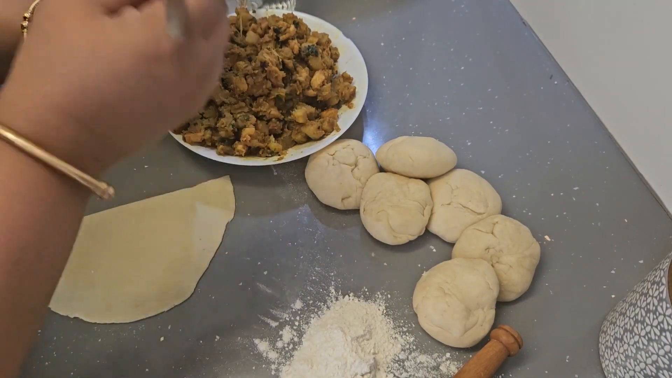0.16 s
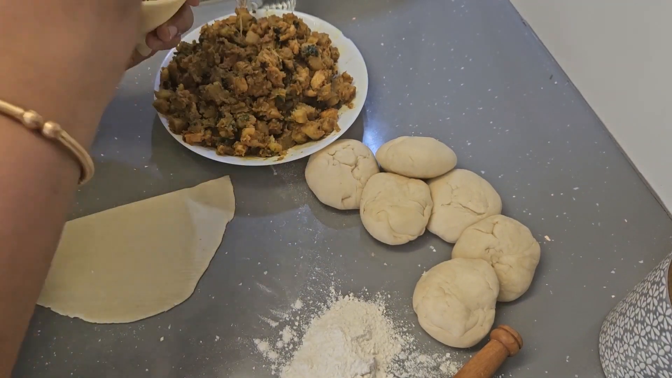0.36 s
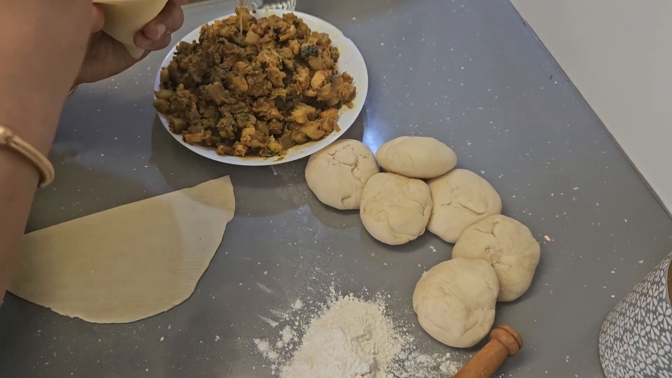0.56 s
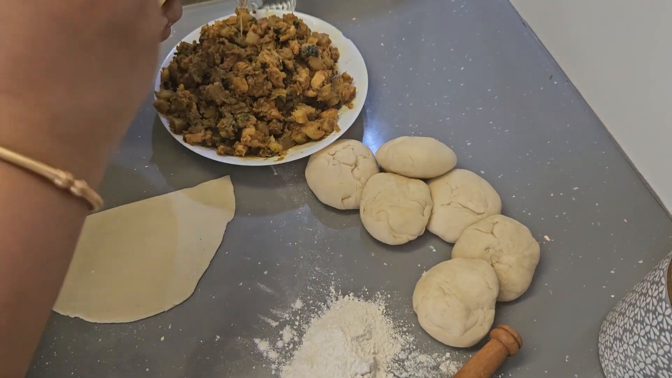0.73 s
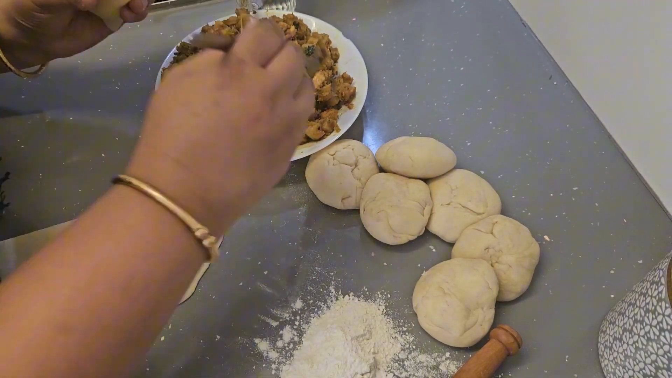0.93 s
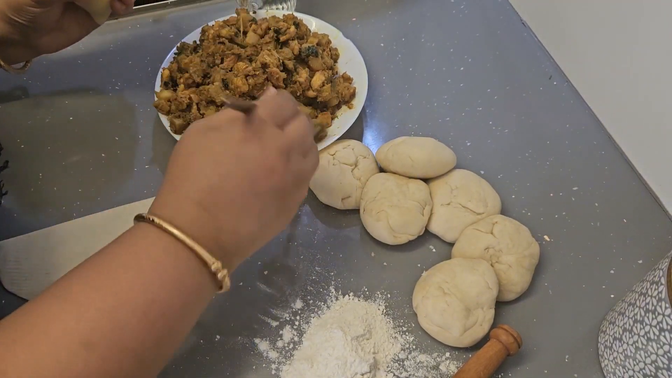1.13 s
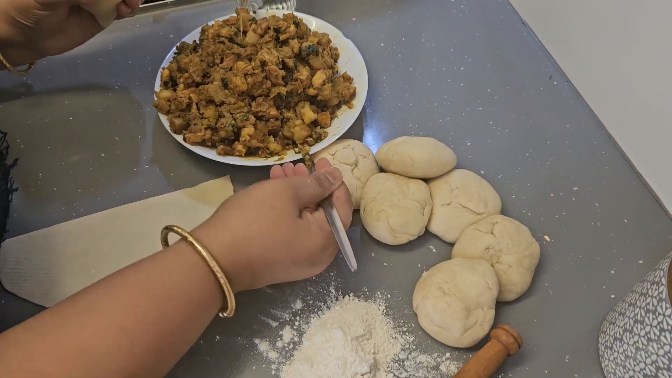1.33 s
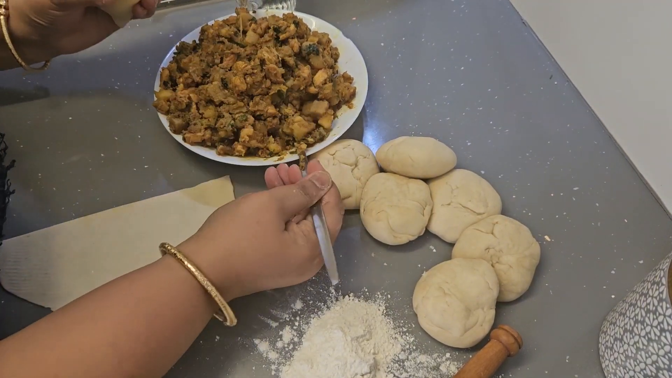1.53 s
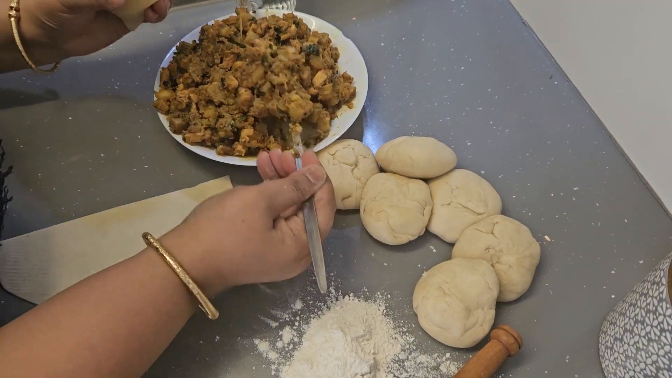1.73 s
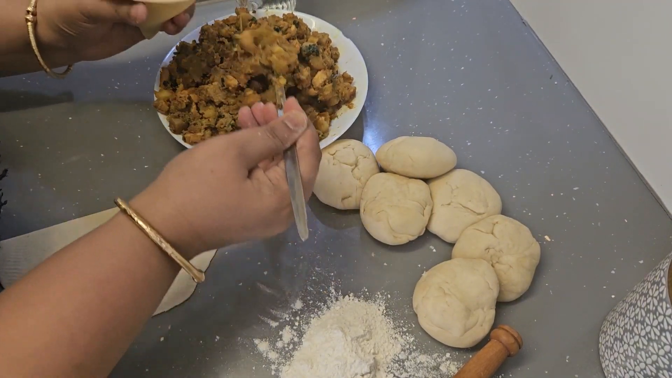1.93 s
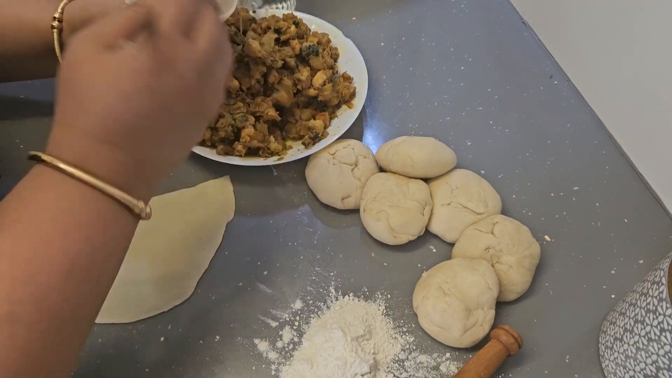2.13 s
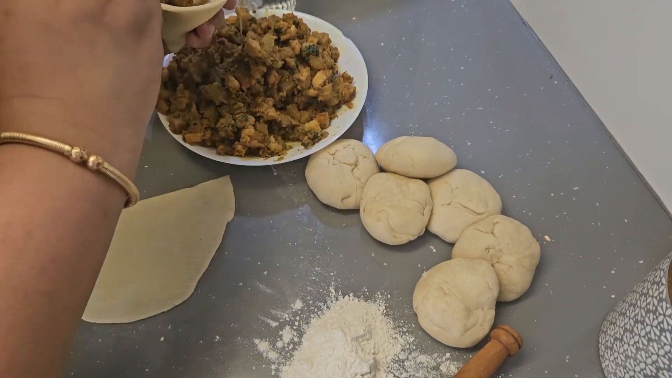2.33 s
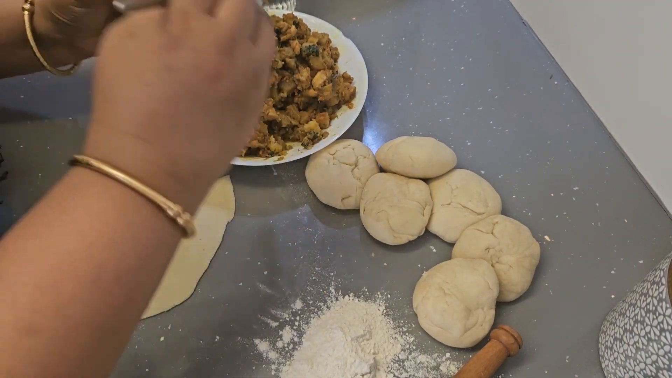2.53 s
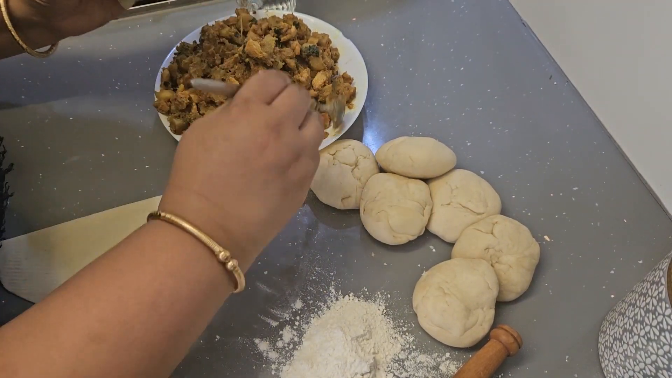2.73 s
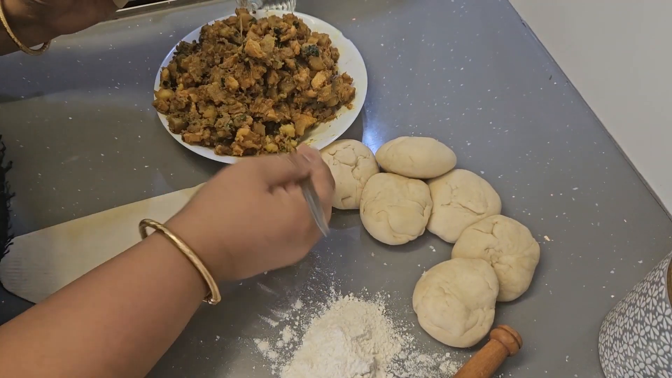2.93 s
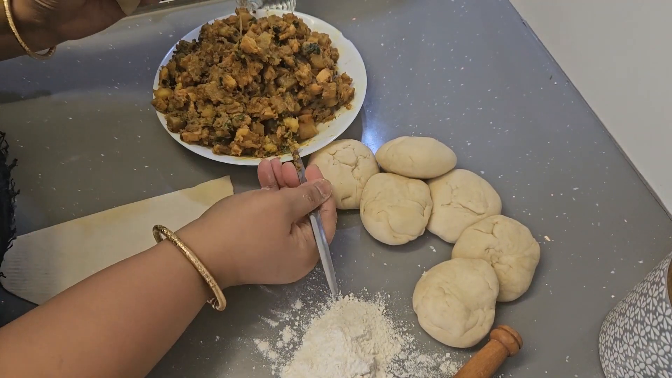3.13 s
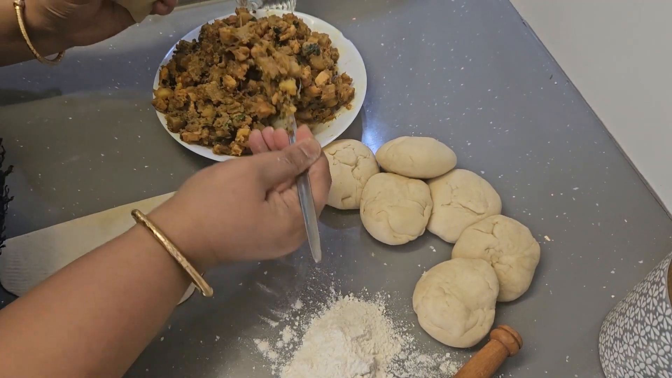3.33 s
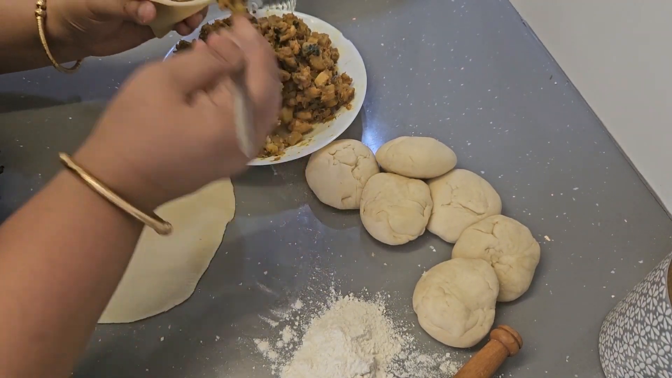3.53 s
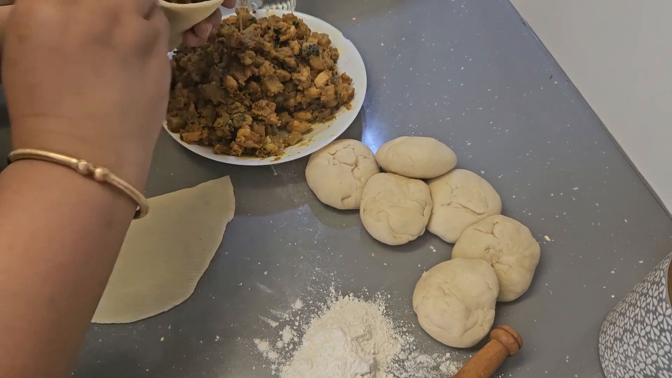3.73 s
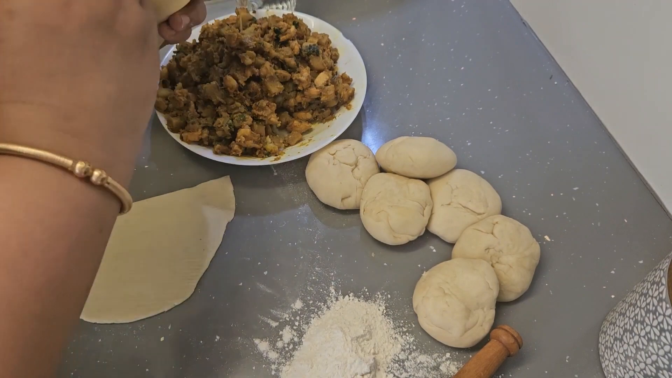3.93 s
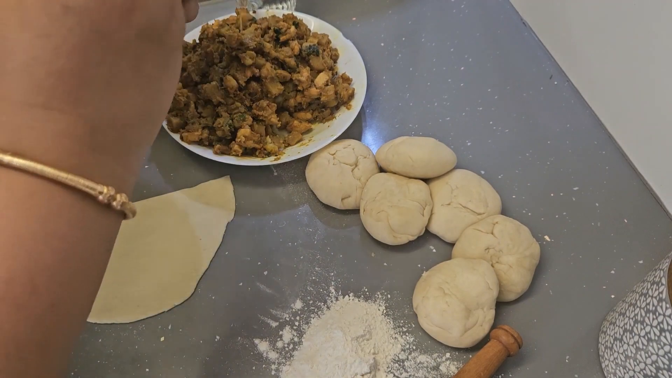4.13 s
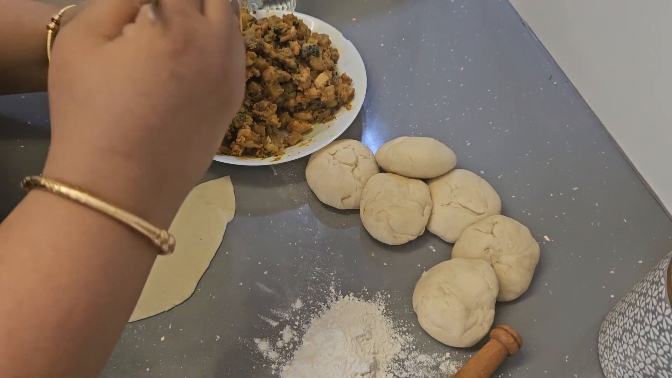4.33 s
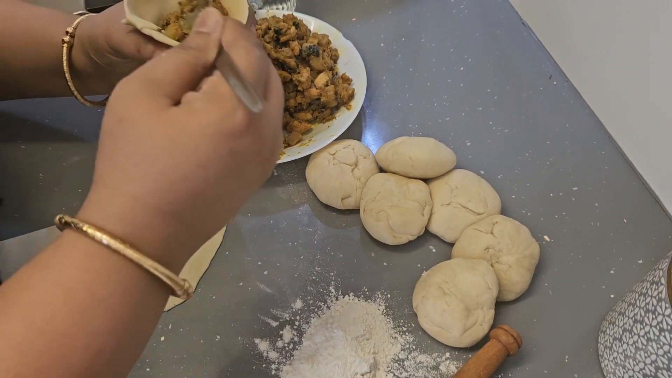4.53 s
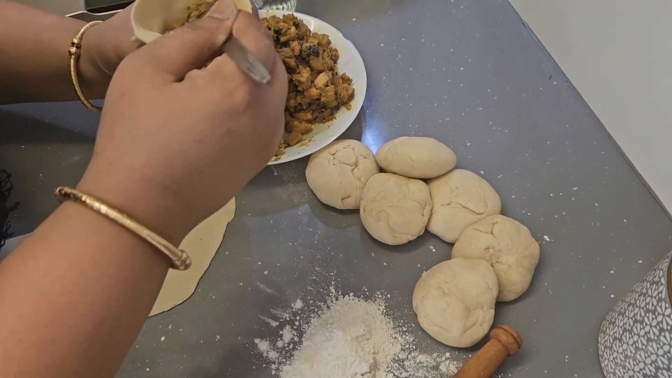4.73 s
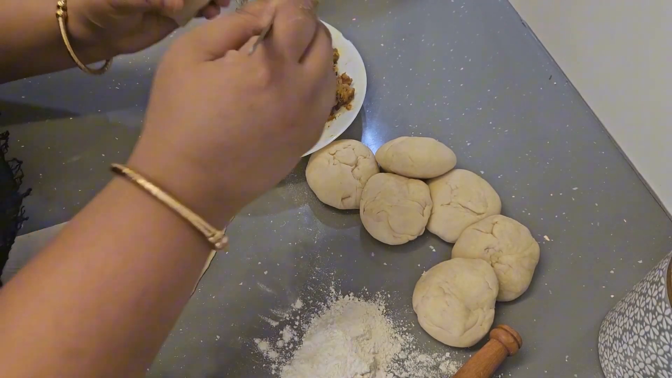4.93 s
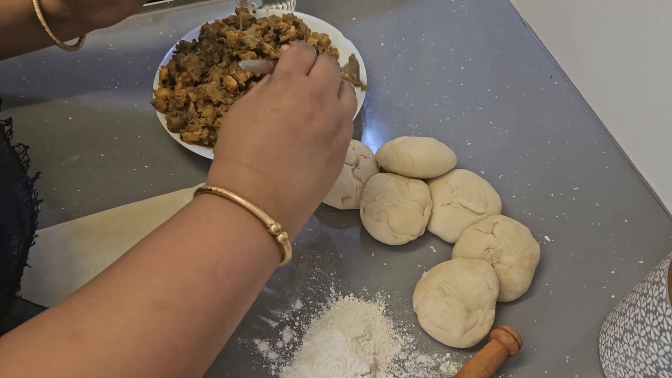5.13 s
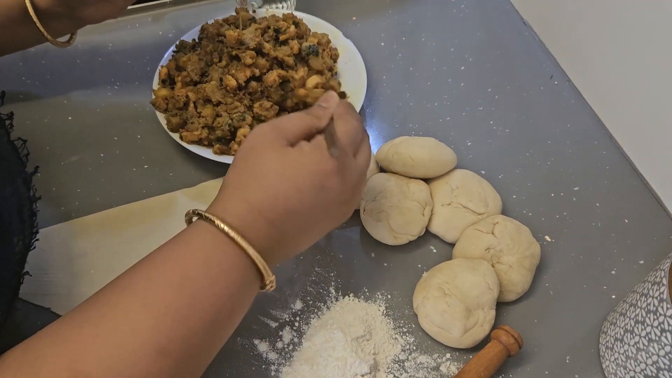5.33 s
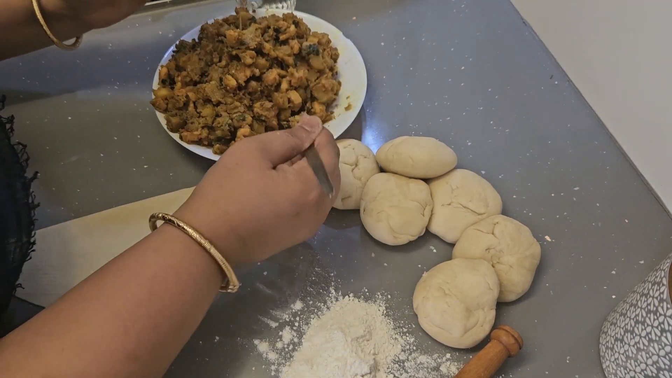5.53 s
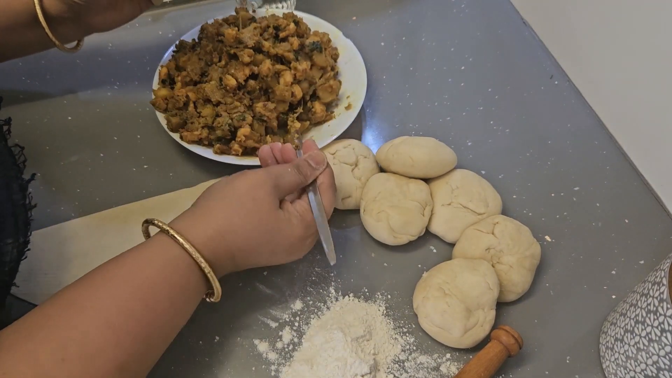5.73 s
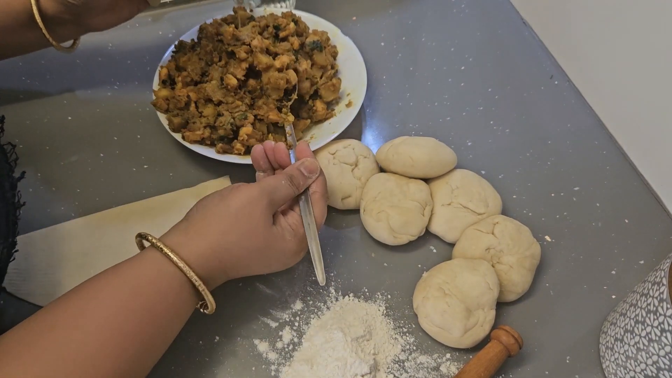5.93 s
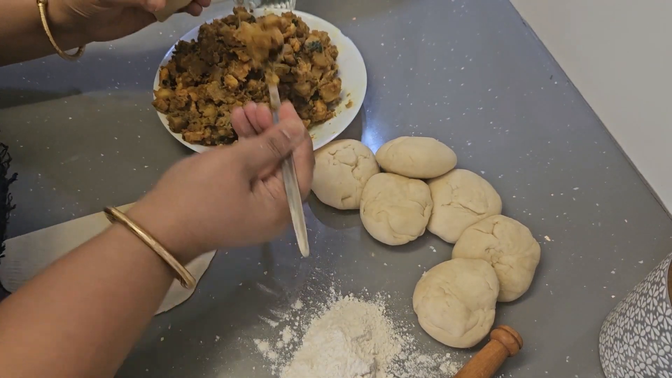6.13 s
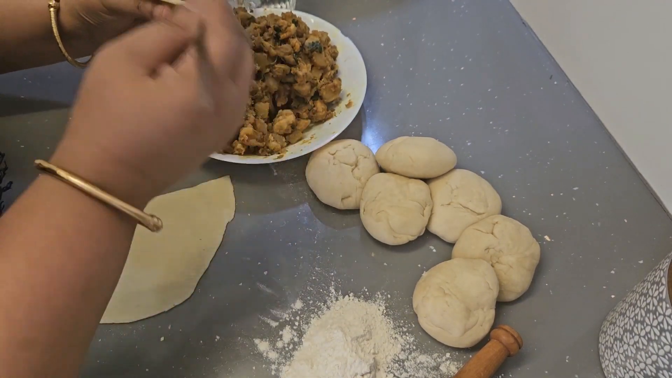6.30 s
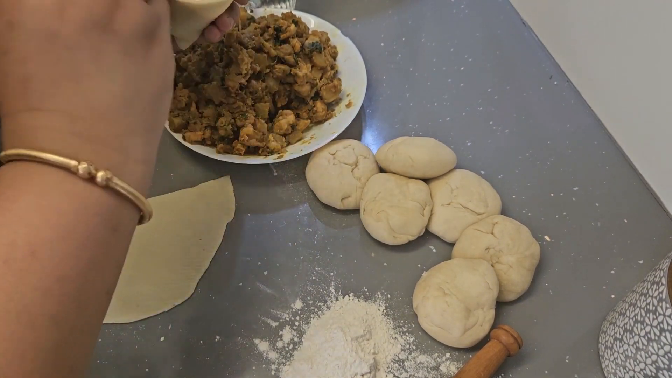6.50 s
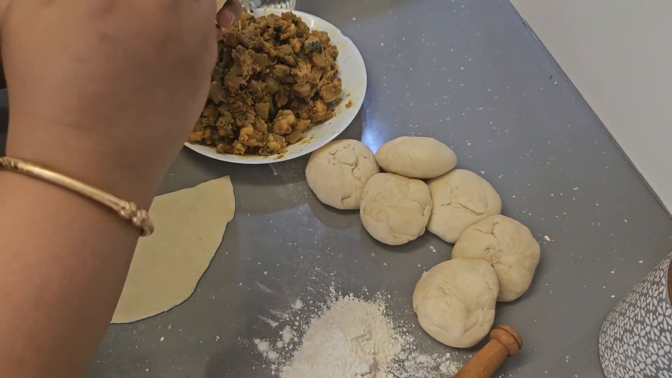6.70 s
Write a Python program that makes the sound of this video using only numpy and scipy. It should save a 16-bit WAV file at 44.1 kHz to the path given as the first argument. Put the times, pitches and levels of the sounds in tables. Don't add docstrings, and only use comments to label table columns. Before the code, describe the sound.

A steel spoon clinks on a food-heaped ceramic plate in three short bursts, with faint moist ticks over low kitchen rumble, hum and hiss.

```python
import sys
import numpy as np
from scipy import signal
from scipy.fft import rfft, irfft
from scipy.io import wavfile
from scipy.ndimage import uniform_filter1d

SR = 44100
rng = np.random.default_rng(int(sys.argv[2]) if len(sys.argv) > 2 else 0)


def bounce(signal):
    frames = np.transpose(np.atleast_2d(signal))
    limited = np.clip(frames, -1, 1)
    pcm = np.round(limited * 32767).astype(np.int16)
    wavfile.write(sys.argv[1], SR, pcm)


def magnitude_from_level(level_db):
    exponent = np.asarray(level_db, float) / 20
    return 10 ** exponent


N = 302470


def unit_rms(x):
    return x / np.sqrt(np.mean(x ** 2) + 1e-20)


def read(points, hz):
    f, value = np.transpose(points)
    return np.interp(np.log(hz + 1), np.log(f + 1), value)


def bumps_db(resonances, hz):
    return sum(db / (1 + (2 * (hz - f) / w) ** 2) for f, w, db in resonances)


def add(mix, start_s, sound):
    part = mix[..., round(start_s * SR):][..., :sound.shape[-1]]
    part += sound[..., :part.shape[-1]]


def rumble_spectrum_db(hz):
    # frequency in Hz, density in dB per Hz.
    rumble = [(8.8, -45), (15, -14.5), (38, -2.5), (59, -7.5), (75, -22), (102, -6), (143, -18), (304, -22),
              (378, -18.5), (451, -22), (539, -24.5), (786, -29.5), (958, -27.5), (1210, -28), (1700, -64),
              (2210, -72), (3740, -120)]
    # centre in Hz, width in Hz, height in dB.
    room_tones = [(196.8, 8.4, 6.5), (258, 20, 2.5), (340, 42, 6.5), (384.7, 10.2, 7), (435.3, 35.6, 10.5),
                  (648, 54, 8), (778.7, 19, 11.5), (1250, 85, 9)]
    return read(rumble, hz) + bumps_db(room_tones, hz)


def hiss_spectrum_db(hz):
    # frequency in Hz, density in dB per Hz.
    hiss = [(820, -33), (1400, -2.5), (1600, -9), (2320, -8.5), (2520, -3.5), (2740, -17), (3070, -8.5),
            (5470, -2), (6860, -7), (8260, -3.5), (9750, -9.5), (12000, -0.5), (13400, -7), (15850, -5.5),
            (16100, -54)]
    # centre in Hz, width in Hz, height in dB.
    port_tones = [(1868, 36, 7.5), (3010, 690, 4), (4270, 31, 12), (7410, 106, 6.5), (12030, 280, 7.5),
                  (12300, 180, -6.5)]
    return read(hiss, hz) + bumps_db(port_tones, hz)


def steady_noise(spectrum_db, patchy_db):
    # frequency in Hz, correlation from -1 to 1.
    likeness = [(60, 0.99), (130, 0.98), (290, 0.87), (640, 0.48), (1410, -0.15), (3100, -0.04),
                (6820, 0.11), (15000, 0.06)]
    # frequency in Hz, left over right in dB.
    tilt = [(60, 2.5), (150, -2.5), (380, -1.0), (950, 0), (2380, 0.5), (5980, 1.5), (15000, -2.5)]
    frames, hz = N // 512 + 5, np.fft.rfftfreq(2048, 1 / SR)
    a, b, c, d, patches = rng.standard_normal((frames, 1025, 5)).T
    patches = uniform_filter1d(patches, size=12, axis=0)
    patches = unit_rms(uniform_filter1d(patches, size=10, axis=1))
    same = np.clip(read(likeness, hz), -1, 1)[:, None]
    left = a + 1j * b
    right = same * left + np.sqrt(1 - same ** 2) * (c + 1j * d)
    side_db = np.multiply.outer([.5, -.5], read(tilt, hz))
    level_db = (spectrum_db(hz) + side_db)[..., None] + patchy_db * patches
    z = np.array([left, right]) * magnitude_from_level(level_db)
    return unit_rms(signal.istft(z, nperseg=2048, noverlap=1536)[1][:, :N])


def noise_floor():
    rumble_db, hiss_db = -51, -56
    rumble = magnitude_from_level(rumble_db) * steady_noise(rumble_spectrum_db, 1.0)
    return rumble + magnitude_from_level(hiss_db) * steady_noise(hiss_spectrum_db, 1.0)


def wavering_tone(hz, rms_db):
    waver_db, waver_top_hz = 4, 3.5
    t, phase = np.arange(N) / SR, rng.random(12)
    rates_hz = waver_top_hz * np.geomspace(.2, 1, 12)
    waver = sum(np.sin(2 * np.pi * (f * t + p)) for f, p in zip(rates_hz, phase))
    turns = np.cumsum(hz + 0 * t) / SR
    return np.sqrt(2) * magnitude_from_level(rms_db + waver_db * unit_rms(waver)) * np.sin(2 * np.pi * turns)


def compressor():
    hum_hz, hum_db, start_s, rise_s = 49.1, -51.5, 0.64, 1.8
    fade_s, fade_db_per_s = 5.7, 10.5
    t = np.arange(N) / SR
    up = np.clip((t - start_s) / rise_s, 0, 1)
    return np.sqrt(up) * wavering_tone(hum_hz, hum_db - fade_db_per_s * np.maximum(t - fade_s, 0))


def engine():
    idle_hz, slow_hz, slows_s, slowing_s = 31.4, 24.74, 3.6, 1.9
    idle_db, slowing_dip_db, third_order, third_db = -58.5, -20, 2.93, -57
    t = np.arange(N) / SR
    slowed = np.clip((t - slows_s) / slowing_s, 0, 1)
    speed_hz = idle_hz + (slow_hz - idle_hz) * slowed
    first = wavering_tone(speed_hz, idle_db + slowing_dip_db * np.sqrt(slowed))
    return first + slowed ** 5 * wavering_tone(third_order * speed_hz, third_db)


def traffic():
    # centre in seconds, half length in seconds, frequency in Hz, level in dB.
    booms = [(0.02, 0.1, 31.3, -51.5), (0.296, 0.15, 99.4, -59), (0.698, 0.2, 100.2, -58.5),
             (1.298, 0.054, 49, -61), (1.343, 0.068, 96.5, -54.5), (2.002, 0.32, 93, -59.5),
             (2.706, 0.096, 94.6, -55), (3.25, 0.14, 95, -58), (3.695, 0.05, 105.3, -49),
             (3.884, 0.21, 49.1, -47), (4.013, 0.11, 101.9, -46), (4.367, 0.2, 100.1, -50.5),
             (4.85, 0.11, 100.8, -54.5), (5.276, 0.14, 48.1, -42), (5.304, 0.17, 99.8, -53),
             (5.62, 0.083, 47.83, -47), (5.947, 0.17, 25.13, -50), (6.09, 0.13, 96, -46),
             (6.377, 0.061, 44.8, -50), (6.538, 0.057, 99, -49.5), (6.666, .08, 46.5, -54),
             (6.845, 0.059, 102, -53.5)]
    t, out = np.arange(N) / SR, np.zeros(N)
    for centre_s, half_s, hz, db in booms:
        swell = np.exp(-((t - centre_s) / half_s) ** 2)
        out += np.sqrt(2) * magnitude_from_level(db) * swell * np.cos(2 * np.pi * hz * t)
    return out


def kitchen(x):
    # frequency in Hz, t60 in seconds.
    decay = [(300, 0.6), (1000, 0.27), (3000, 0.3), (8000, 0.29), (15000, 0.083)]
    taps = np.zeros((2, SR // 2))
    at = np.arange(100, SR // 2 - 20, 20)
    at = at + rng.integers(0, 20, (2, len(at)))
    np.put_along_axis(taps, at, rng.choice([-1., 1.], at.shape), 1)
    taps *= 1 + 1.0 * np.exp(-np.arange(SR // 2) / SR / 0.014)
    hz, t, z = signal.stft(taps, SR, nperseg=256)
    z = z / np.sqrt(abs(z) + 1e-9)
    z = z * magnitude_from_level(-60 * t / read(decay, hz)[:, None])
    tail = signal.istft(z, SR, nperseg=256)[1]
    return signal.fftconvolve(x, tail / np.linalg.norm(tail[0]), axes=1)[:, :x.shape[1]]


def modes(hz, db, t60_s, rise_s, wide, beat=0):
    t = np.arange(min(SR // 2, int(SR * np.max(t60_s)) + 200)) / SR
    phase, late, turn, split = rng.random((len(hz), 4)).T[..., None]
    hz, db, t60_s = (np.reshape(v, (-1, 1)) for v in (hz, db, t60_s))
    contact_s = rise_s * (.5 + late)
    size = magnitude_from_level(db - 60 * np.maximum(t - 0.44 * contact_s, 0) / t60_s)
    size *= np.clip(t / contact_s, 0, 1) ** 2
    size *= 1 + beat * np.cos(2 * np.pi * (25 + 45 * split) * t)
    angle = 2 * np.pi * (hz * t + phase)
    middle = (size * np.sin(angle)).sum(0)
    lean = hz / 25000
    side_size = wide * hz / (hz + 500) * size
    side = (side_size * np.cos(angle + 0.71 * (turn - .5) + lean)).sum(0)
    return np.pad([middle + side, middle - side], [(0, 0), (0, SR // 2 - len(t))])


def knock():
    # start in seconds, level in dB.
    set_down = (5.802, -34)
    # frequency in Hz, level in dB, t60 in seconds.
    hollow = [(257, 1, 0.31), (343, -11.5, 0.19), (435, -7, 0.15), (530, -3, 0.074), (598, -16, 0.24),
              (836, -18, 0.1)]
    start_s, peak_db = set_down
    body = magnitude_from_level(peak_db) * modes(*np.transpose(hollow), 0.016, 0.45) * magnitude_from_level([[-.7], [.7]])
    return start_s, body + magnitude_from_level(-10) * kitchen(body).mean(0)


def tick(start_s, peak_db, hz, length_ms):
    t = np.arange(900) / SR
    puff = rng.standard_normal((2, 900)) * np.exp(-t * 1000 / length_ms)
    edges_hz = [hz * 0.87, min(hz * 1.24, 16000)]
    puff = signal.sosfilt(signal.butter(2, edges_hz, "band", fs=SR, output="sos"), puff)
    return start_s, magnitude_from_level(peak_db + 8.5) * puff / abs(puff).max()


def tinkle(start_s, peak_db, hz, t60_s):
    return start_s, modes([hz, hz * 1.02], [peak_db - 4, peak_db - 8], [t60_s, t60_s], 0.002, 0.82)


def contact_crack(hz, db, width_hz, rise_s):
    u = np.arange(SR // 2) / SR / rise_s
    envelope = np.minimum(u, .6) * np.exp(-np.maximum(u - 1.6, 0) / 2.0)
    scratch = rfft(rng.standard_normal((2, SR // 2)) * envelope)
    even = np.sqrt(uniform_filter1d(abs(scratch) ** 2, size=120))
    scratch /= even / np.sqrt(rise_s * SR)
    scratch = np.array([[1, 1.0], [1, -1.8]]) @ scratch / np.sqrt(2)
    bins_hz = np.fft.rfftfreq(SR // 2, 1 / SR)[:, None]
    blurred = (magnitude_from_level(db) * np.sqrt(width_hz) / (1 + ((bins_hz - hz) / 550) ** 2)).sum(1)
    between = 0.14 * np.exp(-np.log(bins_hz[:, 0] / 2200 + 1e-9) ** 2 / 0.5)
    return irfft(scratch * (blurred / blurred.max() + between), SR // 2) * (u < 40)


def scatter(colour, db):
    hz = np.fft.rfftfreq(SR // 2, 1 / SR)
    low_cut = hz ** 2 / (hz ** 2 + 450 ** 2)
    delay = np.exp(-2j * np.pi * hz * .003)
    click = irfft(magnitude_from_level(read(colour, hz)) * low_cut * delay, SR // 2)
    return magnitude_from_level(db) * click / np.linalg.norm(click)


def clink(row, spot, family_db, rings, sideways, colour, scatter_db):
    # frequency in Hz, level in dB, t60 in seconds.
    plate_body = [(600, -2.5, 0.074), (691, 0.5, 0.054), (1042, -2, 0.02), (1393, 11, 0.012),
                  (1510, 1, 0.025), (1784, -11, 0.096), (2230, -8, 0.066), (2620, -2, 0.049)]
    family_edges_hz = [800, 1200, 1430, 1700]
    # centre in Hz, width in Hz, level in dB.
    clink_gaps = [(4740, 160, -7), (5000, 160, -9), (13500, 330, -1)]
    start_s, peak_db, contact_ms, crack_db, pan_db = row
    rise_s = contact_ms / 1000
    hz, width_hz, db = np.transpose(spot)
    width_hz = np.clip(width_hz, 30, 900)
    damped = modes(hz, db + 20 * np.log10(width_hz), 2.0 / width_hz, rise_s, 1.0)
    damped /= abs(damped.mean(0)).max()
    crack = contact_crack(hz, db, width_hz, rise_s)

    body_hz, body_db, body_t60_s = np.transpose(plate_body)
    body_db = body_db + np.take(family_db, np.searchsorted(family_edges_hz, body_hz))
    free = modes(body_hz, body_db, body_t60_s, rise_s, 0.97)
    free = free + modes(*np.transpose(rings), rise_s, 0.73, beat=0.74)
    free = free + modes(*np.transpose(sideways), rise_s, 0) * [[1], [-.8]]

    pan = magnitude_from_level(peak_db + np.array([[.5], [-.5]]) * pan_db)
    sound = pan * (damped + free + magnitude_from_level(crack_db) * crack)
    room_db = -13
    echo = kitchen(magnitude_from_level(room_db) * sound + scatter(colour, peak_db + scatter_db))
    gaps = magnitude_from_level(bumps_db(clink_gaps, np.fft.rfftfreq(SR // 2, 1 / SR)))
    return start_s - .0006, irfft(rfft(sound + echo) * gaps, SR // 2)


def landing_spots():
    # frequency in Hz, width in Hz, level in dB.
    rim = [(2290, 200, -6), (3100, 100, -11), (4450, 120, -13), (5510, 79, -4), (6140, 130, 3.5),
           (8340, 140, 3), (8800, 100, -6), (10000, 200, -9), (11300, 89, -7), (12300, 290, -2),
           (12450, 160, -7), (13000, 78, -19), (14100, 95, -7), (15800, 120, -16)]
    # Hz, Hz, dB.
    rim_graze = [(3310, 120, -1.5), (3800, 120, -6), (4470, 250, -2), (5830, 260, 1), (7350, 130, -5.5),
                 (8930, 100, -9), (9360, 470, -11), (11000, 130, -1), (11600, 100, -5), (12300, 150, 0),
                 (14500, 270, -6), (15000, 99, -17), (15500, 97, -21)]
    # Hz, Hz, dB.
    under_food = [(1210, 170, -2), (1890, 94, 1), (2250, 200, 0), (2920, 77, -5), (3500, 91, -7)]
    # Hz, Hz, dB.
    slope = [(2860, 55, -4), (3380, 110, -4.5), (4350, 110, -8), (5510, 61, -4), (6500, 330, -2),
             (8100, 340, 2.5), (8800, 170, -14), (9500, 130, -13), (10250, 91, -1.5), (10900, 95, -5),
             (12300, 120, -3), (13500, 64, -15), (13950, 130, -12), (14900, 150, -10)]
    # Hz, Hz, dB.
    spoon_edge = [(3070, 220, -10), (5380, 130, -11), (6160, 180, -6.5), (6630, 120, -13), (7320, 160, -2),
                  (7980, 72, -8), (8100, 97, -11), (8970, 190, -9), (9900, 130, -12), (10440, 95, -5),
                  (12300, 520, -10), (14300, 100, -10), (14900, 87, -15), (15600, 110, -18)]
    # Hz, Hz, dB.
    spoon_back = [(690, 88, 0.5), (2884, 89, 8), (3400, 58, 0), (4400, 130, -4), (5400, 400, 0),
                  (7300, 210, -15), (8100, 200, -10), (9000, 130, -9), (9590, 150, -20),
                  (11100, 230, -10.5), (12300, 120, -18), (15700, 110, -25)]
    # Hz, Hz, dB.
    well = [(1550, 160, -5), (2210, 130, -3.5), (3390, 140, -3), (4400, 150, -3), (5540, 190, 5.5),
            (6240, 130, -3.5), (7430, 150, 0), (3740, 110, -4), (8230, 180, -2), (9070, 130, -5),
            (9700, 110, 0.5), (12180, 90, 1.5), (12980, 290, -3), (15200, 110, 0)]
    return [rim, rim_graze, under_food, slope, spoon_edge, spoon_back, well]


def scene():
    # start in seconds, level in dB, centre in Hz, length in ms.
    food_ticks = [(0.1474, -55, 5600, 3), (0.2344, -59, 4200, 3), (0.7944, -54, 8640, 3),
                  (0.8494, -52, 8100, 3.7), (0.9714, -52, 8230, 3), (2.992, -53.5, 1410, 20),
                  (1.672, -47, 8500, 2.9), (4.0433, -50, 4930, 3.3), (4.2236, -49, 8340, 3),
                  (4.6857, -51.5, 8580, 3), (4.724, -53, 5250, 3), (5.0823, -50.5, 5510, 4.4),
                  (5.094, -50, 7140, 3.3), (5.525, -50, 5400, 2.6), (5.629, -53, 3560, 3),
                  (5.658, -45, 10000, 3.1), (5.6744, -51, 5500, 2.7), (5.7694, -56, 5040, 3.3),
                  (5.8294, -55, 5070, 2.5), (5.943, -44.5, 10400, 3), (6.1894, -58, 4700, 2.7),
                  (6.29, -53, 8500, 3.8),
                  (0.9637, -46, 11600, 3.3), (2.0338, -47.5, 11850, 3), (2.7317, -52, 11600, 3),
                  (5.257, -39, 14000, 3), (6.5495, -49, 12300, 3)]
    # start in seconds, level in dB, frequency
    # in Hz, t60 in seconds.
    tinkles = [(1.1365, -26.5, 2290, 0.067), (1.297, -52, 5620, 0.09), (3.2276, -52, 7400, 0.05),
               (3.7838, -50, 7340, 0.05), (6.3096, -50, 7350, 0.05), (6.3294, -53, 7320, 0.05),
               (6.399, -44.5, 7420, 0.053), (6.4333, -57, 7460, 0.05)]
    # start in seconds, peak in dB, contact in ms, crack in dB, left over right in dB.
    clinks = [
        (1.13, -21.5, 2, 4.5, 1.5),
        (1.37, -25.5, 1.5, 5.5, 2),
        (1.507, -44, 2.3, 4.5, 1),
        (2.788, -19.5, 2, 0.5, 2.5),
        (2.899, -18, 2.06, 3.5, 2.5),
        (3.0237, -25, 1.4, 3.5, 0),
        (5.2104, -8.5, 1.93, -2, 2.5),
    ]
    # level in dB under 800, 1200, 1430, 1700 Hz and above.
    families = [(-23, -20, -18, -19, -25), (-20.5, -26, -22, -16.5, -29), (-30, -15, -15, -15, -18),
                (-20.5, -17, -19.5, -22, -23), (-31.5, -25, -24, -23.5, -34), (-15.5, -15, -29, -16, -15),
                (-31.5, -21.5, -29, -17, -19)]
    # frequency in Hz, level in dB, t60 in seconds.
    free_rings = [
        [(2300, -25, 0.27), (2390, -25, .1), (2980, -26, 0.17), (3350, -29, .12), (4355, -19, 0.19),
         (5420, -27, 0.16), (6230, -33, .1), (8240, -29, 0.16), (8340, -36, .2), (12700, -35, 0.072)],
        [(727, -26, 0.11), (2120, -37, 0.086), (2530, -36, .1), (3100, -23, .12), (3760, -21, 0.11),
         (4400, -26, .12), (4460, -17, 0.12), (5330, -25, .14), (5900, -31, .1), (11850, -33, .1)],
        [(2330, -30, .06)],
        [(727, -24.5, .12), (2120, -26, 0.14), (2297, -24.5, 0.16), (2720, -26, 0.17), (2880, -23, 0.14),
         (3465, -24, 0.11), (4375, -25, 0.19), (5420, -19.5, 0.07), (7320, -23, .15), (8265, -35, 0.41),
         (13020, -31, .15)],
        [(1097, -30, 0.14), (1690, -34, 0.17), (2430, -31, 0.17), (2970, -34, .06), (3350, -33, .06),
         (6357, -31, 0.15), (7390, -20, 0.13), (7170, -30, 0.43), (8340, -36, .1), (9100, -29, 0.14),
         (12500, -19, 0.16)],
        [(712, -22, 0.15), (2520, -32, .1), (2720, -31, .09), (3380, -33, .08), (4400, -19.5, .1),
         (5587, -24, .12), (7200, -36, .07)],
        [(544, -32, 0.14), (1600, -23, 0.055), (1730, -37, 0.092), (2160, -32, 0.11), (2280, -31, 0.16),
         (3480, -27, 0.083), (4400, -26.5, 0.18), (2720, -33, 0.14), (2920, -29, 0.14), (5530, -22, .05),
         (5650, -35, 0.097), (7100, -31, .1), (8250, -38, 0.36), (8380, -35, 0.3), (12500, -28, 0.14),
         (14870, -42, .1)],
    ]
    # Hz, dB, seconds.
    sideways_modes = [
        [(3200, -17, .03), (7500, -24, .03)],
        [(2330, -22, .03), (11110, -19, .03), (11945, -18, .03)],
        [(2000, -30, .02)],
        [(2960, -7, .03), (5530, -20, .02), (8245, -17, .03)],
        [(6140, -15, .025), (7180, -7, .03), (13500, -26, .03)],
        [(2260, -7, .03), (13000, -34, .03)],
        [(832, -29, 0.066), (1844, -18, 0.047), (3340, -15, .03), (3870, -20, .03), (6600, -18, .03),
         (8330, -5, 0.03), (12960, -16, .035)],
    ]
    # frequency in Hz, density in dB per Hz.
    scatter_colours = [
        [(290, -44), (500, -11), (2330, -1), (3590, -13), (4340, -6), (4730, -16), (6230, -5), (16000, -16)],
        [(290, -32), (500, -3), (1950, -17), (4470, -6), (4800, -10), (5470, -6), (12100, -11), (16000, -20)],
        [(290, -37), (500, -7), (3440, -16), (5710, -27), (7310, -23), (16000, -20)],
        [(290, -31), (500, -1), (1060, -11), (4400, -6), (4870, -42), (5390, -8), (7980, -11), (16000, -24)],
        [(290, -44), (500, -14), (1670, -15), (1900, -13), (3020, -10), (4600, -18), (7420, -6), (16000, -21)],
        [(290, -34), (500, -4), (750, -1), (1380, -11), (2770, -9), (4870, -16), (5470, -10), (16000, -28)],
        [(290, -37), (500, -6), (2290, -6), (3590, -8), (4400, -9), (4940, -12), (8330, -7), (14700, -9),
         (16000, -21)],
    ]
    scatter_levels_db = [7.5, 8.5, -2, 5, 7, 4.5, 2.5]
    mix = noise_floor() + compressor() + engine() + traffic()
    add(mix, *knock())
    for row in food_ticks:
        add(mix, *tick(*row))
    for row in tinkles:
        add(mix, *tinkle(*row))
    for strike in zip(clinks, landing_spots(), families, free_rings, sideways_modes, scatter_colours,
                      scatter_levels_db):
        add(mix, *clink(*strike))
    return mix


def roll_off(x):
    return signal.sosfilt(signal.butter(12, 16650, fs=SR, output="sos"), x)


def record(dry):
    low_pass = signal.firwin(301, 16000, window=("kaiser", 8), fs=SR)
    mix = signal.oaconvolve(dry, low_pass[None], "same")
    return roll_off(mix)


dry = scene()
out = record(dry)
bounce(out)
```